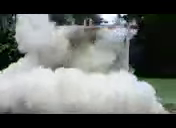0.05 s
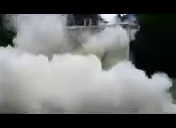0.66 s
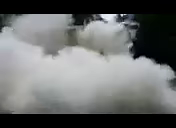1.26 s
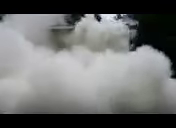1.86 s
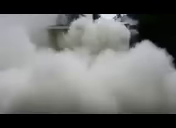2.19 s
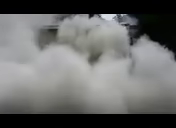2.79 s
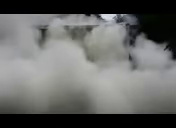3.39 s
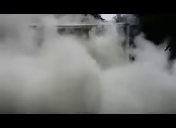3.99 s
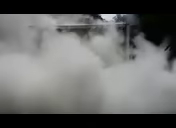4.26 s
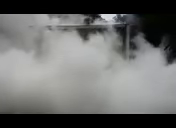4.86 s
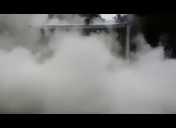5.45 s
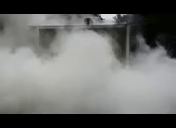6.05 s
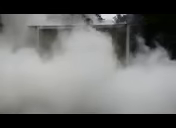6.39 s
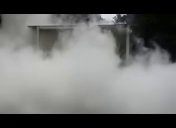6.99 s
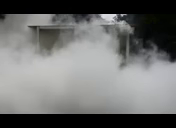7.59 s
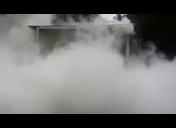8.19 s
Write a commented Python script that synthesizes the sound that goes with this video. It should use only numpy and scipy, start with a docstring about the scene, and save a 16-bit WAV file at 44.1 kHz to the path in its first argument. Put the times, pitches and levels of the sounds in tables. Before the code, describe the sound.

A fire suppression unit discharges close by in an open shelter on a lawn. A bright, fluttering hiss surges twice and sags. About a second in, a louder, deeper blast bursts out, sputtering with a slightly hollow ring, and runs down within a second or so. Afterwards small birds give faint, high peeps and soft falling whistles over the steady rush of a distant road, where one engine hums slightly nearer toward the end.

```python
"""A bright, hissing jet surges and sags as a fire suppression unit empties over burning pans in an open
shelter on a lawn. Then the main valve gives way: a much deeper blast bursts out, sputters and runs down
within a second. Both are turbulent noise, coloured by the shelter's reflections and resonances.
Small birds peep and whistle nearby in gliding sine tones. Underneath lies the steady rush of a distant
road: tyres, rumble and one engine drawing nearer."""
import sys
import numpy as np
from scipy import signal
from scipy.fft import rfft, irfft, next_fast_len
from scipy.io import wavfile
from scipy.ndimage import uniform_filter1d, map_coordinates

SR = 44100
rng = np.random.default_rng(int(sys.argv[2]) if len(sys.argv) > 2 else 0)


def put_to_file(sound):
    """Save the sound as 16-bit audio at rate SR, in the file named by the first command-line argument."""
    columns = np.atleast_2d(sound).T  # one column per channel
    safe = np.clip(columns, -1, 1)
    whole_steps = np.round(safe * 32767)
    wavfile.write(sys.argv[1], SR, whole_steps.astype(np.int16))


N = 363384

# Tone of the blast: f/Hz, relative level/dB
BLAST_SPECTRUM = [(50, -54.5), (110, -25), (180, -29), (260, -18), (330, -10.5), (385, -7), (470, -14),
                  (570, -13), (690, -1), (900, -4), (1020, -2), (1300, 1), (2650, -3.5), (4280, -9),
                  (6800, -19.5)]
# Puffs of agent within the blast: peak t/s, level/dB, half width/s
BLAST_PUFFS = [(1.045, -22.5, 0.018), (1.11, -18.5, 0.022), (1.25, -23.5, 0.02)]
# Tone of the first jet: f/Hz, relative level/dB
JET_SPECTRUM = [(41, -48), (70, -21), (129, -20), (193, -16.5), (423, -9), (533, -11.5), (586, -13),
                (1440, -5), (1650, -4.5), (1850, -2.5), (2460, -1.5), (3680, 6), (6800, -1.5), (8840, -43),
                (15000, -120)]
# Swells of the jet's hiss: peak t/s, level/dB, half width/s
HISS_SWELLS = [(0.01, -27.5, 0.048), (0.305, -27, 0.1)]
# Resonances of the shelter: f/Hz, width/Hz, lift at full ring/dB
SHELTER_MODES = [(361, 22, 5.5), (521, 19, 11.5), (752, 15, 4), (867, 22, 1.5), (906, 17, 17),
                 (1840, 24, 4.5), (2200, 27, 7.5), (2250, 19, 5), (2250, 17, -3), (2590, 11, 10.5),
                 (2890, 20, 2.5), (3445, 48, 2)]
# Reflections off ground and walls: delay/ms, gain
REFLECTIONS = [(1.13, 0.052), (2.62, 0.16), (4.35, 0.075), (5.08, 0.048), (11.9, 0.17), (12.9, 0.18)]
# Bird peeps: t/s at the top of the arch, top f/Hz, level/dB
PEEP_CUES = [(2.528, 3880, -39.5), (2.545, 4270, -43.5), (3.243, 4160, -44), (3.478, 3980, -45),
             (3.848, 4010, -44.5), (3.979, 4240, -42), (4.684, 4290, -47), (4.825, 4050, -38),
             (5.425, 4360, -53), (5.534, 4030, -40), (5.655, 4300, -48.5), (5.936, 4050, -47),
             (6.053, 4320, -53), (6.204, 4180, -45.5), (6.990, 4310, -49), (7.154, 3990, -43),
             (7.581, 4110, -46), (7.628, 3980, -45.5)]
# Shape of one peep: t/s from the top, share of top pitch, low voice level/dB, high voice level/dB
PEEP_ARCH = [(-.04, 0.52, -38, -17), (-.028, .69, -18.5, -1), (-.018, .87, -6, 0), (-.007, 1, -4, -10.5),
             (.002, 0.98, -3, -11.5), (.013, .98, -8.5, -18.5), (0.023, 0.63, -3, -28.5),
             (.027, .65, -11.5, -37)]
# Higher peeps lean more on the high voice: top f/Hz, high voice trim/dB
HIGH_VOICE_TRIM = [(3950, -18), (4200, -11)]
# Soft falling whistles: t/s, length/s, starting f/Hz, level/dB
WHISTLE_CUES = [(2.963, .05, 3300, -47.5), (3.044, 0.057, 3450, -48), (3.115, 0.034, 2780, -43),
                (5.0, 0.053, 3350, -46.5), (5.064, .045, 2750, -46), (6.879, .082, 3460, -50.5),
                (6.969, .025, 2700, -42.5)]
# Loudness of the tyre rush: t/s, level/dB
TYRE_LEVELS = [(2.2, -33.5), (3.59, -33), (3.88, -34), (6.25, -35), (6.78, -34), (8.04, -35.5), (8.24, -34)]
# Tone of the tyre rush: f/Hz, relative level/dB
TYRE_SPECTRUM = [(150, -56), (250, -29), (330, -24.5), (358, -21.5), (406, -22), (695, -11), (867, -4.5),
                 (1040, -3.5), (1620, -8.5), (1800, -11.5), (2250, -16.5), (3090, -22.5), (4550, -30),
                 (6800, -39.5), (8840, -71), (15000, -120)]
# Tone of the road's rumble: f/Hz, relative level/dB
RUMBLE_SPECTRUM = [(25, -26), (45, -18), (75, -4.5), (105, -0.5), (150, -3.5), (210, -3.5), (280, -10.5),
                   (400, -17), (800, -46)]
# The engine pulls harder: peak t/s, level/dB, half width/s
ENGINE_PULLS = [(6.98, -63, 0.093), (7.89, -55, 0.064), (8.2, -60, .06)]

BURST_S, OPEN_S = .932, .0074  # the main valve opens: when, and how fast
LEAK_S, LEAK_DB = .893, -8.5  # it leaks just before it gives way; level against fully open
ROAR_DB, ROAR_SAG_DB_PER_S = -20.5, 8.5  # the roar sinks as the pressure drops
ROAR_ENDS_S, ROAR_FALL_DB_PER_S = 1.6, 29.5  # the agent runs out
HISS_DB, HISS_SAG_DB_PER_S = -24, 7.5  # the hiss of the gas sinks too
HISS_ENDS_S, HISS_FALL_DB_PER_S = 1.81, 49  # the gas lasts a little longer
HOLLOW_DB, HOLLOW_RISE_DB, HOLLOW_BUILD_S = -8.5, 11.5, .13  # low note: level against the roar, build-up
JET_BODY_DB, JET_SAG_DB_PER_S = -28, 11.5  # the jet's body sinks as the pressure drops
JET_HISS_DB = -35.5  # the hiss between swells
PEEP_ECHO_DB = -46.5  # the echo stays the same whichever way a bird faces
WHISTLE_FALL = .104  # share of its pitch that a whistle loses
ENGINE_HZ, ENGINE_DB = 162, -71  # firing rate, and level while far off
ENGINE_NEARS_S, ENGINE_DB_PER_S = 4.7, 3.5  # when it starts to draw nearer, and how fast it grows
TOP_HZ = 6900


def blast():
    """The main discharge: a sputtering roar of agent and hiss of gas, with a hollow note building below."""
    turbulence = shelter(rush(BLAST_SPECTRUM, patchy_db=.77), ring=.78)
    low, rest = split(turbulence, edge_hz=610)
    roar, hiss = split(rest, edge_hz=2420)
    agent = amp(ROAR_DB) * run_down(ROAR_SAG_DB_PER_S, ROAR_ENDS_S, ROAR_FALL_DB_PER_S)
    gas = amp(HISS_DB) * run_down(HISS_SAG_DB_PER_S, HISS_ENDS_S, HISS_FALL_DB_PER_S)
    hollow = amp(HOLLOW_DB + np.interp(clock() - BURST_S, [0, HOLLOW_BUILD_S], [-HOLLOW_RISE_DB, 0]))
    valve = np.maximum(amp(LEAK_DB) * opening(LEAK_S), opening(BURST_S))
    sputter = amp(.32 * wobble(60))
    return valve * sputter * (agent * (unit(roar) + hollow * unit(low)) + gas * unit(hiss))


def opening(s):
    """A valve's smooth step from shut to open."""
    return .5 + .5 * np.tanh((clock() - s) / OPEN_S)


def run_down(sag_db_per_s, ends_s, fall_db_per_s):
    """Envelope of an emptying vessel: a slow sag from the burst on, then a quick fall."""
    return amp(-sag_db_per_s * since(BURST_S) - fall_db_per_s * since(ends_s))


def puffs():
    """Slugs of agent leave the nozzle as short, dull puffs."""
    roar = shelter(rush(BLAST_SPECTRUM, patchy_db=1), ring=1)
    dull, _ = split(roar, edge_hz=1050)
    return unit(dull) * swells(BLAST_PUFFS)


def jet():
    """The first jet: bright nozzle spray swells over a sagging body, and cuts out as the blast opens."""
    spray = shelter(rush(JET_SPECTRUM, patchy_db=.5), ring=.1)
    body, hiss = split(spray, edge_hz=2400)
    body_gain = amp(JET_BODY_DB - JET_SAG_DB_PER_S * clock())
    hiss_gain = amp(JET_HISS_DB) + swells(HISS_SWELLS)
    flutter = amp(.5 * wobble(45))
    return (1 - opening(BURST_S)) * flutter * (body_gain * unit(body) + hiss_gain * unit(hiss))


def shelter(x, ring):
    """Close reflections comb the sound; the shelter's hollow lifts a few notes, scaled by ring."""
    comb = lambda hz: 1 + sum(gain * np.exp(-2j * np.pi * hz * ms / 1000) for ms, gain in REFLECTIONS)
    lift = lambda hz: sum(db / (1 + (2 * (hz - f) / width) ** 2) for f, width, db in SHELTER_MODES)
    return filtered(x, lambda hz: comb(hz) * amp(ring * lift(hz)))


def peeps():
    """Each bird peep arches up and down with a slight quaver; a higher voice leads it on the way up."""
    direct, echo_send = np.zeros(N), np.zeros(N)
    knots, share, low_db, high_db = np.transpose(PEEP_ARCH)
    t = np.arange(knots[0], knots[-1], 1 / SR)
    taper = signal.windows.tukey(len(t), .15)
    quaver = 1 + .007 * wobble(260)

    def voice(hz, shape_db, lead_s=0):
        """One sine that follows the arch."""
        phase = 2 * np.pi * np.cumsum(hz * np.interp(t + lead_s, knots, share)) / SR
        return amp(np.interp(t, knots, shape_db)) * np.sin(phase)

    for s, top_hz, db in PEEP_CUES:
        start = round((s + knots[0]) * SR)
        span = slice(start, start + len(t))
        pitch = top_hz * quaver[span]
        trim_db = np.interp(top_hz, *np.transpose(HIGH_VOICE_TRIM))
        high = amp(trim_db) * voice(1.61 * pitch, high_db, lead_s=.005)
        call = np.sqrt(2) * taper * (voice(pitch, low_db) + high)
        direct[span] += amp(db) * call
        echo_send[span] += call
    return direct + amp(PEEP_ECHO_DB) * garden_echo(echo_send, t60=.33, onset_s=.015)


def whistles():
    """Soft bird calls slide downwards between the peeps."""
    calls = np.zeros(N)
    for s, length, start_hz, db in WHISTLE_CUES:
        count = round(length * SR)
        phase = 2 * np.pi * np.cumsum(start_hz * np.linspace(1, 1 - WHISTLE_FALL, count)) / SR
        calls[round(s * SR):][:count] += amp(db) * signal.windows.tukey(count, .5) * np.sin(phase)
    return calls + amp(-8) * garden_echo(calls, t60=.4, onset_s=.017)


def garden_echo(x, t60, onset_s):
    """Trees and buildings scatter a call into a short, diffuse tail."""
    t = np.arange(SR // 2) / SR
    tail = rng.standard_normal(len(t)) * amp(-60 * t / t60) * np.minimum(t / onset_s, 1) ** 2
    return signal.fftconvolve(x, tail / np.linalg.norm(tail))[:N]


def traffic():
    """The background bed: tyre rush from a distant road over its low rumble."""
    tyre_db = np.interp(clock(), *np.transpose(TYRE_LEVELS))
    tyres = amp(tyre_db + .12 * wobble(13)) * rush(TYRE_SPECTRUM, patchy_db=.62)
    rumble = amp(-57.5 + .56 * wobble(2.5)) * rush(RUMBLE_SPECTRUM, patchy_db=1)
    return tyres + rumble


def engine():
    """A far engine draws nearer, humming at its firing rate with a softer tone a fifth below."""
    phase = 2 * np.pi * np.cumsum(ENGINE_HZ * (1 + .017 * wobble(14))) / SR
    hum = unit(np.sin(phase) + amp(-6) * np.sin(phase * 2 / 3))
    nearness = amp(ENGINE_DB + ENGINE_DB_PER_S * since(ENGINE_NEARS_S))
    waver = amp(1.5 * wobble(6.5))
    return (nearness + swells(ENGINE_PULLS)) * waver * hum


def rush(spectrum, patchy_db):
    """Turbulent noise of rms 1: a spectrum with drifting patches of gain."""
    frames = signal.stft(rng.standard_normal(N), nperseg=512)[2]
    patches = uniform_filter1d(rng.standard_normal(frames.shape), size=5, axis=0)  # across frequency
    patches = uniform_filter1d(patches, size=12, axis=1)  # across time
    noise = signal.istft(frames * amp(patchy_db * unit(patches)), nperseg=512)[1][:N]
    f, db = np.transpose(spectrum)
    return unit(filtered(noise, lambda hz: amp(np.interp(np.log(hz + 1), np.log(f), db))))


def swells(rows):
    """Bell-shaped envelopes from rows of peak t/s, level/dB, half width/s."""
    return sum(amp(db) * np.exp(-.5 * ((clock() - s) / width) ** 2) for s, db, width in rows)


def wobble(rate):
    """A smooth random curve, rate knots a second."""
    return map_coordinates(rng.standard_normal(int(N * rate / SR) + 4), [clock() * rate])


def split(x, edge_hz):
    """Crossover: the parts of x below and above an edge."""
    low = filtered(x, lambda hz: 1 / (1 + (hz / edge_hz) ** 8))
    return low, x - low


def filtered(x, response):
    """Equalise x with a gain given as a function of frequency."""
    size = next_fast_len(N + SR // 2)
    return irfft(rfft(x, size) * response(np.fft.rfftfreq(size, 1 / SR)), size)[:N]


def amp(db):
    """Decibels to gain."""
    return 10 ** (np.asarray(db) / 20)


def unit(x):
    """Scale to rms 1."""
    return x / np.sqrt(np.mean(x ** 2) + 1e-20)


def clock():
    """The time of each sample in seconds."""
    return np.arange(N) / SR


def since(s):
    """Seconds since a cue, zero before it."""
    return np.maximum(clock() - s, 0)


def scene():
    """The mono mix: discharge in front, road and birds behind."""
    discharge = jet() + blast() + puffs()
    return (discharge + traffic() + engine() + peeps() + whistles())[None]


def record(dry):
    """A steep high cut takes off the top of the mix."""
    high_cut = lambda hz: np.clip((TOP_HZ - hz) / 200 + .5, 0, 1)
    return np.array([filtered(channel, high_cut) for channel in dry])


dry = scene()
out = record(dry)
put_to_file(out)
```